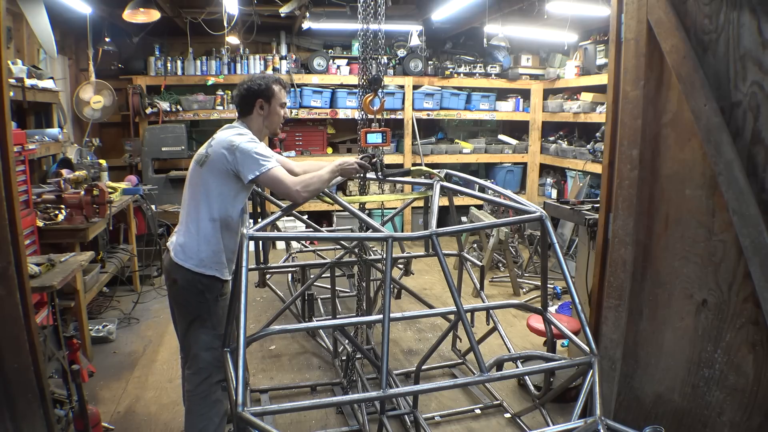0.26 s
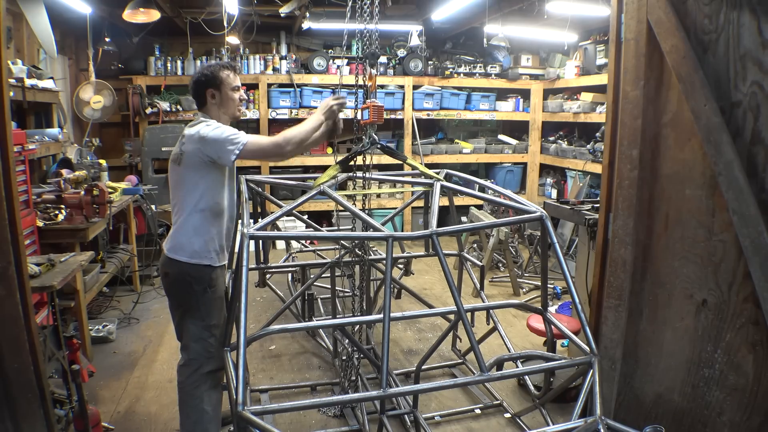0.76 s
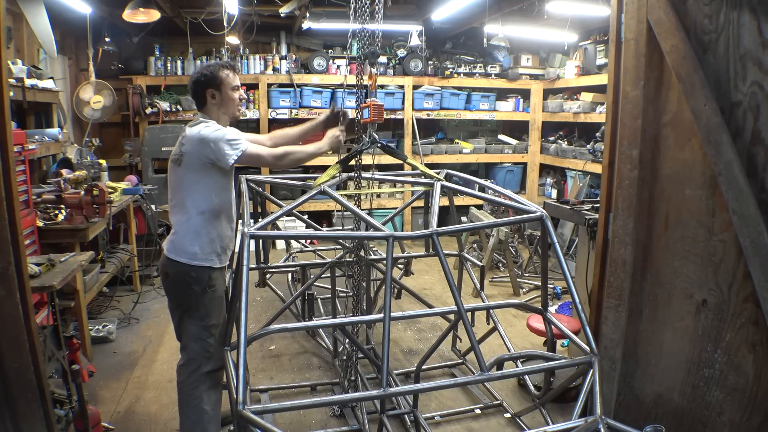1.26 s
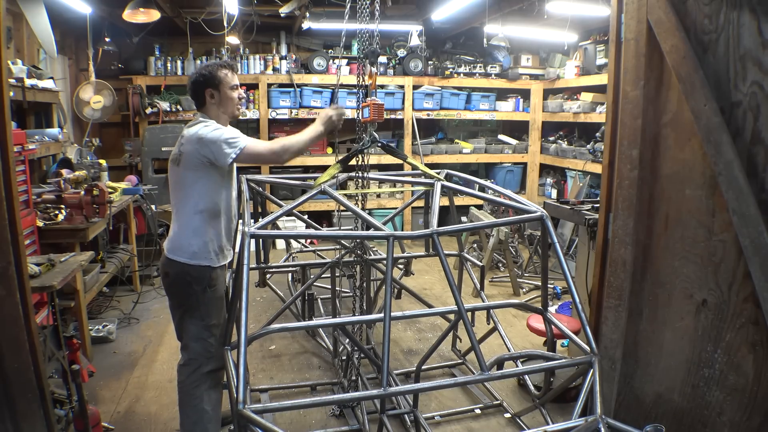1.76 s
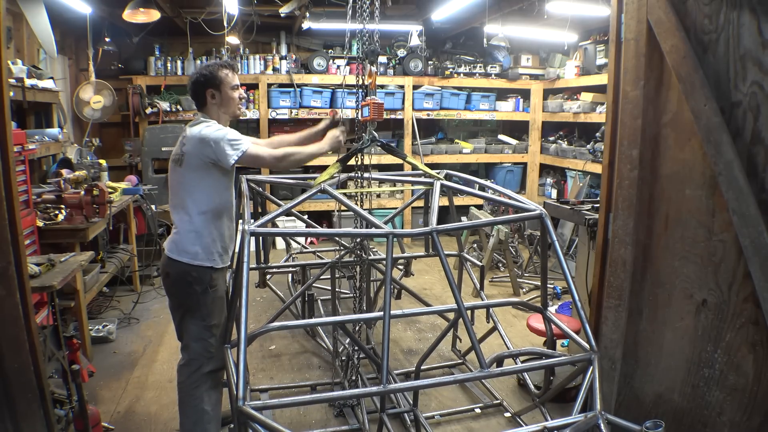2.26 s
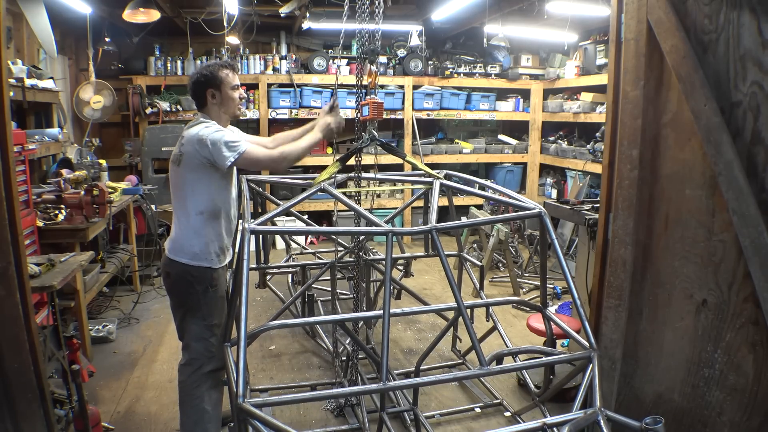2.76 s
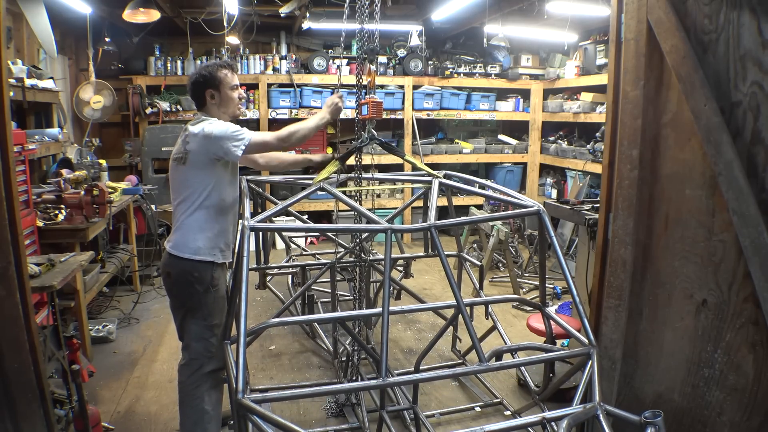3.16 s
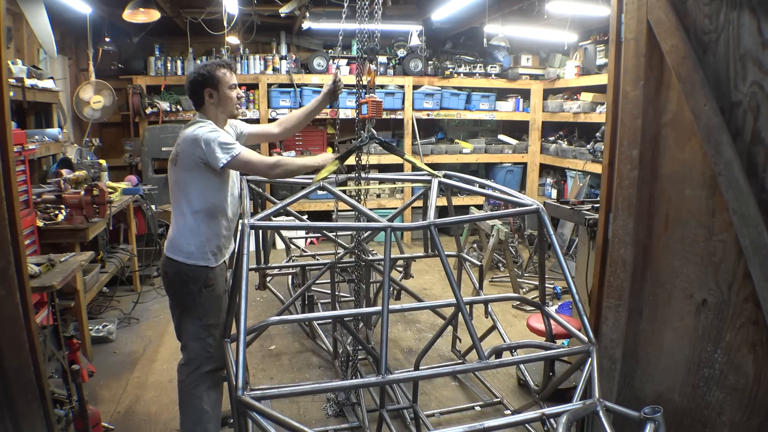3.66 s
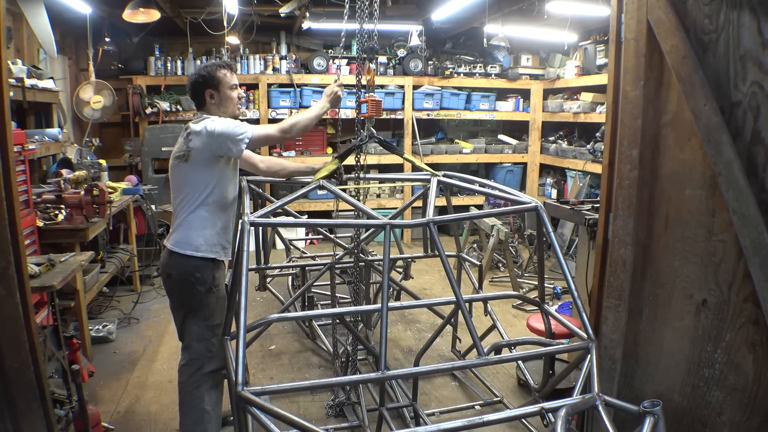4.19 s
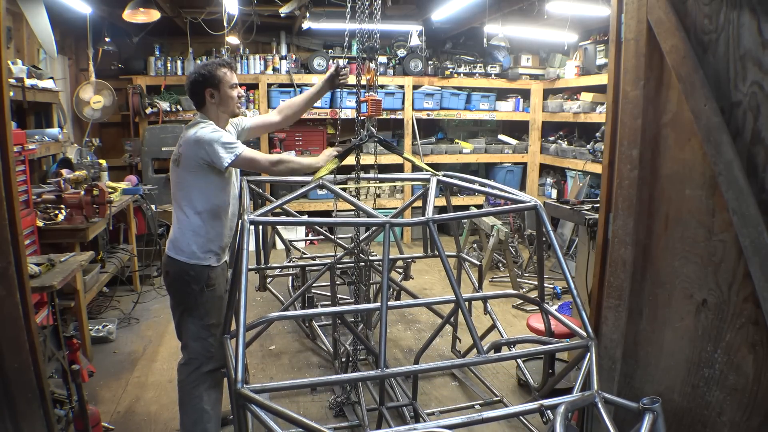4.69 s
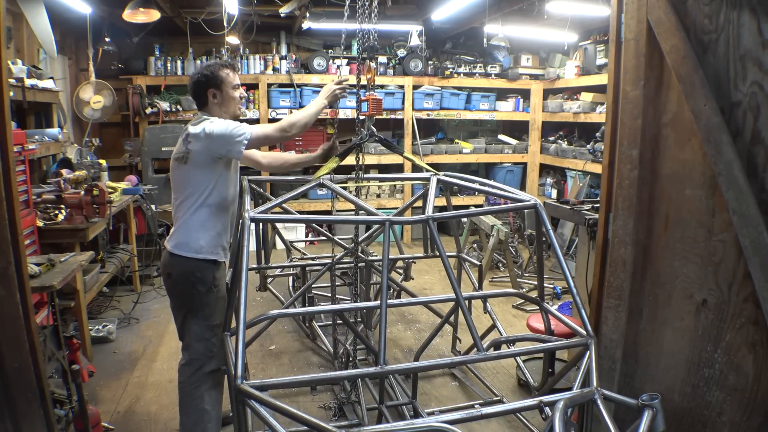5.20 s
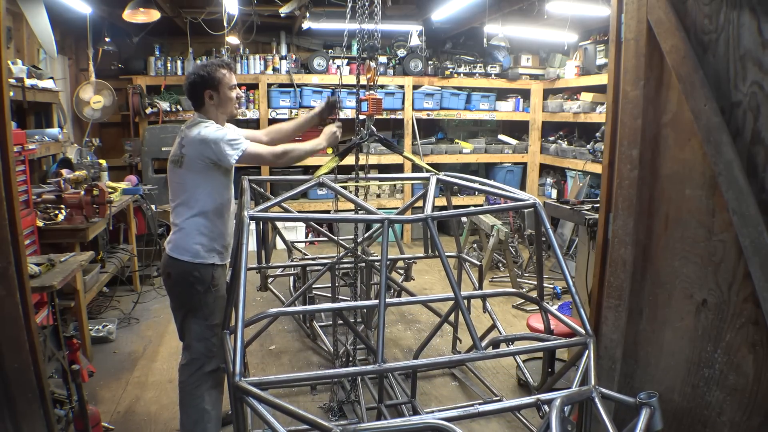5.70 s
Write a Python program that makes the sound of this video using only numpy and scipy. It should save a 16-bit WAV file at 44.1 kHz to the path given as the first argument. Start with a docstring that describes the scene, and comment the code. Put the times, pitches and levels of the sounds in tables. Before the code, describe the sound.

Steel chain rattles and jingles through a hoist in quick surges, with ratchet clicks and knocking gears, in a workshop.

```python
"""A garage: a hand chain hoist lifts a steel frame, pulled hand over hand a few metres away.
The handled chain rings out, then the pulls start. The ratchet pawl ticks faster and slower with each,
the chain rattles over the hand wheel, its links clash, ring and knock into their pockets, and the
gears knock in their housing. The cluttered room adds a short tail."""
import sys
import numpy as np
from scipy import signal
from scipy.fft import rfft, irfft
from scipy.io import wavfile
from scipy.ndimage import uniform_filter1d

SR = 44100
rng = np.random.default_rng(int(sys.argv[2]) if len(sys.argv) > 2 else 0)


def wav_record(signal):
    """Record a signal, one row per channel, as 16-bit PCM in the file named by sys.argv[1]."""
    frames = np.transpose(np.atleast_2d(signal))
    bounded = np.clip(frames, -1, 1)
    # unit amplitude maps onto the largest positive 16-bit level
    quanta = np.round(bounded * 32767).astype(np.int16)
    wavfile.write(sys.argv[1], SR, quanta)


N = 261954
TIME = np.arange(N) / SR
FIRST_PULL_S = .394
CREEP_TEETH_PER_S = 17  # below this the pawl only drops now and then

# Hand-over-hand pulls. Each row: start in s, length in s, rise in s, run-on t60 in s, top speed in
# ratchet teeth per s, then relative levels in dB of chain, housing and link ring.
PULLS = [(0.382, 0.11, 0.0041, 0.85, 41.4, -23, -33, -23), (0.606, 0.59, 0.1, 1.3, 53, -21.5, -31, -23),
         (1.218, 0.31, 0.038, 1.5, 45.6, -21.5, -34, -21.5),
         (1.651, 0.43, 0.18, 1.4, 53, -22.5, -30.5, -20.5),
         (2.169, 0.34, 0.021, 1.4, 55.3, -23, -31.5, -43),
         (2.538, 0.077, 0.016, 0.87, 23, -21.5, -31.5, -23),
         (2.708, 0.36, 0.031, 2.47, 49, -21.5, -30, -22), (3.17, 0.3, 0.045, 1.85, 43.4, -20.5, -30, -28.5),
         (3.656, .52, 0.036, 1.6, 50, -21.5, -29.5, -20.5), (4.18, 0.59, .04, 1.2, 38, -22, -31.5, -22.5),
         (4.838, .48, 0.061, 0.48, 46.5, -21, -30, -21.5), (5.483, 0.033, 0.0053, 2.5, 15, -26, -36, -25),
         (5.637, 0.35, 0.026, 1.04, 41.4, -21.5, -30.5, -23)]
# Steel modes of hand wheel, links and link jingle. Each row: frequency in Hz, relative level in dB.
WHEEL_MODES = [(1480, 2), (1625, 5), (1705, 4), (1840, 1.5), (1910, 6), (1990, 3), (2340, -1.5), (2379, 5),
               (2430, 2), (2475, 1), (2855, 2.5), (2885, 4.5), (2920, 2), (3186, 6), (3230, 0.5),
               (3275, -1), (3618, -4), (3900, 7), (4040, 7), (4115, 2.5), (4156, 6.5), (4285, 1),
               (4856, 6.5), (4910, 4), (4948, 3.5), (4985, -3)]
LINK_MODES = [(5515, 7.7), (5575, 3.9), (5635, 6.5), (5695, 5), (5787, 5), (5940, 3), (6015, 5.5),
              (6055, 6.8), (6125, 3), (6202, 8), (6290, 1), (6390, 1), (6457, 2)]
JINGLE_MODES = [(6790, -1), (7060, 0), (7160, 0), (7505, -10), (7947, 0), (8345, 3), (8473, -2), (8685, 6),
                (9400, -4), (9600, -6), (9700, -7), (9855, -4), (10190, -12), (10400, -4)]
CHAIN_MODES = WHEEL_MODES + LINK_MODES + JINGLE_MODES


def undb(db):
    """Decibels to gain."""
    return 10 ** (np.asarray(db) / 20)


def unit(x):
    """Scale to rms 1."""
    return x / np.sqrt(np.mean(x ** 2))


def convolve(x, response):
    """Apply an impulse response."""
    return signal.fftconvolve(x, response)[:N]


def colour(x, points, size=4096):
    """Minimum-phase filter through (Hz, dB) points, falling 20 dB per octave beyond the ends."""
    hz, db = np.transpose(points)
    octave = np.log2(np.maximum(np.fft.rfftfreq(size, 1 / SR), 1))
    beyond = np.abs(octave - np.clip(octave, np.log2(hz[0]), np.log2(hz[-1])))
    cepstrum = irfft(np.log(undb(np.interp(octave, np.log2(hz), db) - 20 * beyond)))
    cepstrum[1:size // 2] *= 2
    cepstrum[size // 2 + 1:] = 0
    return convolve(x, irfft(np.exp(rfft(cepstrum))))


def fade(t, t60_s):
    """Exponential decay, silent before t = 0."""
    return (t >= 0) * np.exp(-np.log(1000) * np.abs(t) / t60_s)


def burst(t60_s):
    """Dense decaying response of unit energy."""
    response = rng.standard_normal(SR) * fade(TIME[:SR], t60_s)
    return response / np.linalg.norm(response)


def resonate(x, hz, width_hz):
    """One damped mode, as a band-pass."""
    return signal.lfilter(*signal.iirpeak(hz, hz / width_hz, fs=SR), x)


def wander(per_s):
    """Slow random curve with a spread near 1."""
    return np.interp(TIME * per_s, np.arange(1000), rng.standard_normal(1000))


def impacts(per_s, spread_db):
    """Randomly timed contacts of uneven size and either sign, rms 1."""
    hit = rng.random(N) < per_s / SR
    sign = rng.choice([-1, 1], N)
    size = undb(spread_db * np.clip(rng.standard_normal(N), -2, 2))
    return unit(hit * sign * size / np.sqrt(per_s))


def garage_air():
    """Steady noise of the quiet garage."""
    # Each row: frequency in Hz, relative density in dB.
    spectrum = [(25, -19), (60, 4), (130, 0.5), (250, 1.5), (500, -4.5), (1000, -1), (2300, -6.5),
                (5000, -13.5), (15000, -22)]
    return undb(-54.5) * unit(colour(rng.standard_normal(N), spectrum))


def settling():
    """Before the first pull the handled chain rings out."""
    # Chain shimmer. Each row: frequency in Hz, relative density in dB.
    spectrum = [(88, -39), (150, 2), (623, -9), (1000, -2), (2310, -2), (3640, -10), (4160, -11),
                (6430, -8), (7200, -15), (10100, -11), (14000, -34)]
    shimmer = unit(colour(rng.standard_normal(N), spectrum)) * fade(TIME, t60_s=.78)
    ring = sum(undb(db) * resonate(rng.standard_normal(N), hz, width_hz=8)
               for hz, db in WHEEL_MODES + LINK_MODES)
    return undb(-44.5) * shimmer + undb(-44) * unit(ring) * fade(TIME, t60_s=.36)


def wheel_speed():
    """Ratchet teeth per s: each pull spins the wheel up in an early-peaking arc, then it coasts."""
    coast_s, skew, roundness = .1, .8, .45
    speed = np.full(N, .5 * CREEP_TEETH_PER_S)  # the chain still sways between pulls
    for start_s, length_s, _, _, top_speed, *_ in PULLS:
        progress = np.clip((TIME - start_s) / (length_s + coast_s), 0, 1)
        arc = np.abs(np.sin(np.pi * progress ** skew)) ** roundness
        speed = np.maximum(speed, top_speed * arc)
    return speed


def shaking_db(levels_db, rise_scale, trend_db, run_on_scale):
    """How hard a part shakes: each pull rises, holds with a trend and runs out; the strongest leads."""
    shake = np.zeros(N)
    for (start_s, length_s, rise_s, t60_s, *_), db in zip(PULLS, levels_db):
        t = TIME - start_s
        attack = np.sqrt(np.clip(t / (rise_s * rise_scale), 0, 1))
        hold = undb(db + trend_db * (np.clip(t / length_s, 0, 1) - 1))
        run_on = fade(np.maximum(t - length_s, 0), t60_s * run_on_scale)
        shake = np.maximum(shake, attack * hold * run_on)
    uneven_feed_db = wander(per_s=18)
    return 20 * np.log10(shake + 1e-9) + uneven_feed_db


def add_swells(base_db, rows):
    """Level in dB after rounded swells add their power to a base level."""
    power = sum(undb(db) ** 2 * np.sin(np.pi * np.clip((TIME - start_s) / length_s, 0, 1))
                for start_s, length_s, db in rows)
    return 10 * np.log10(undb(base_db) ** 2 + power)


def wavering_mode(x, hz, width_hz, drift=.003):
    """A mode whose pitch shifts a little as one link follows another."""
    pitch_hz = hz * (1 + drift * wander(per_s=7))
    turn = np.exp(2j * np.pi * np.cumsum(pitch_hz) / SR)
    pole = np.exp(-np.pi * width_hz / SR)
    return (turn * signal.lfilter([1], [1, -pole], x * turn.conj())).real


def rattle(contacts, level_db, spectrum, modes, ring_db, width_hz, wander_db, clack_t60_s, spots=8):
    """Contacts clack on a steel part and ring it; which modes answer shifts with the point of contact."""
    force = contacts * undb(level_db) * (TIME >= FIRST_PULL_S)
    spot = rng.integers(spots, size=N)  # each spot clacks differently
    clack = sum(convolve(force * (spot == k), burst(clack_t60_s)) for k in range(spots))
    ring = 0
    for hz, db in modes:
        drive = force * undb(wander_db * wander(per_s=14))
        ring += undb(db) * unit(wavering_mode(drive, hz, width_hz))
    return unit(unit(colour(clack, spectrum)) + undb(ring_db) * unit(ring)) * np.std(force)


def gearbox(teeth_per_s, free_db=-50.5, strain_share=.11):
    """The gears knock and rumble, louder under strain, and shake their housing."""
    # Gears straining under the load, and the swinging load shaking the housing.
    # Each row: start in s, length in s, relative level in dB.
    strains = [(.38, 0.11, -39.5), (.48, .48, -45.5), (1.1, 0.15, -46), (1.44, 0.11, -44), (1.96, .32, -41),
               (2.26, .3, -36), (2.89, .23, -39), (3.36, 0.46, -40.5), (3.8, 1.28, -46), (4.96, 0.16, -39),
               (5.13, 0.18, -37.5), (5.27, 0.32, -42.5), (5.7, 0.34, -37.5)]
    shudders = [(.38, .13, -30), (.6, 0.2, -26.5), (1.78, .19, -28.5), (2.25, .19, -24.5),
                (2.73, 0.29, -26.5), (3.12, 0.089, -27.5), (3.74, 0.17, -28), (4.35, 0.095, -28.5),
                (4.84, 0.29, -26.5), (5.83, 0.14, -26)]
    # Contact spectra and housing modes. Each row: frequency in Hz, relative level in dB.
    gear_spectrum = [(40, -32), (68, -12), (95, 1.5), (170, 0), (240, -5), (330, -0.5), (430, -1),
                     (540, 1.5), (750, -10)]
    housing_spectrum = [(200, -25), (330, -12.5), (430, -11.5), (520, -3.5), (720, -6.5), (860, -0.5),
                        (1150, -3), (1400, -6.5), (1900, -9.5)]
    housing_modes = [(843, 14), (911, 13.5), (975, 11.5), (1030, 8), (1125, 11.5), (1260, 6)]
    *_, pull_db, _ = np.transpose(PULLS)
    gear_db = add_swells(free_db, strains)
    shake_db = shaking_db(pull_db, rise_scale=.073, trend_db=-1.2, run_on_scale=6.1)
    housing_db = add_swells(shake_db + strain_share * (gear_db - free_db), shudders)
    knocks = impacts(24 * teeth_per_s, spread_db=1)
    gears = unit(colour(knocks, gear_spectrum)) * undb(gear_db + 2) * (TIME >= FIRST_PULL_S)
    housing = rattle(knocks, housing_db - .3, housing_spectrum, housing_modes,
                     ring_db=-1.5, width_hz=26, wander_db=3, clack_t60_s=.037)
    return gears + housing


def running_chain(teeth_per_s):
    """Hand wheel rattle and link ring, driven by the same contacts, which crowd as speed rises."""
    # Contact spectra. Each row: frequency in Hz, relative density in dB.
    wheel_spectrum = [(1000, -22.5), (1480, -0.5), (1720, 2), (2020, 2), (2200, 2.5), (2500, 1),
                      (3200, -0.5), (3600, -0.5), (4150, 5), (4600, -3.5), (5200, 1), (6200, -19.5)]
    link_spectrum = [(4800, -39), (5400, -10), (5600, 15), (6100, 15), (6500, 5), (7500, -50)]
    jingle_spectrum = [(5500, -6), (6700, 0), (8700, -3), (9200, -3.5), (10700, -6), (12200, -13),
                       (15800, -22)]
    *_, pull_chain_db, _, pull_link_db = np.transpose(PULLS)
    wheel_db = shaking_db(pull_chain_db, rise_scale=.82, trend_db=-.24, run_on_scale=2.1)
    link_db = shaking_db(pull_link_db, rise_scale=1.9, trend_db=2.2, run_on_scale=2.6)
    jingle_db = shaking_db(pull_chain_db, rise_scale=.86, trend_db=-1.2, run_on_scale=1)
    contacts = impacts(20 * teeth_per_s, spread_db=2)
    wheel = rattle(contacts, wheel_db - 2, wheel_spectrum, WHEEL_MODES,
                   ring_db=-2, width_hz=30, wander_db=3.2, clack_t60_s=.035)
    ring = rattle(contacts, link_db - 5, link_spectrum, LINK_MODES,
                  ring_db=-.5, width_hz=19, wander_db=.5, clack_t60_s=.068)
    jingle = rattle(contacts, jingle_db - 1.23, jingle_spectrum, JINGLE_MODES,
                    ring_db=-9, width_hz=28, wander_db=1.5, clack_t60_s=.07)
    return wheel, ring + jingle


def clashes():
    """Snatching the slack chain sets off a brief flurry of link collisions, part crack, part ring."""
    # Each row: start in s, level in dB, centre in Hz, width in Hz, hold in s, t60 in s,
    # ringing share of the power from 0 to 1.
    snatches = [(0.3935, -17.5, 3380, 9000, 0.008, 0.11, 0), (2.165, -19, 7100, 1500, 0.04, 0.33, 0.95),
                (2.161, -20.5, 3430, 3500, 0.04, 0.8, 0.7), (2.301, -31.5, 1270, 1710, 0.16, 0.2, 0),
                (2.539, -18.5, 10150, 1400, 0.07, 0.26, 0.85), (2.537, -25.5, 3800, 700, 0.052, 0.3, 0.6),
                (2.734, -22, 5770, 600, 0.013, 0.2, 0.9), (3.19, -24, 9660, 1394, 0.024, 0.3, 0.6),
                (3.252, -31, 9810, 1205, 0.052, 0.67, 0.79), (3.283, -22.5, 4180, 6000, 0.023, .1, 0),
                (3.657, -19, 5950, 7030, 0, 0.13, 0.22), (4.722, -22.5, 9890, 1231, 0.024, 0.33, .7),
                (5.491, -25, 2950, 6800, 0.025, 0.33, 0.7), (5.654, -17.5, 2870, 2410, 0.0012, 0.27, 0.81),
                (5.657, -22, 5860, 1990, 0.056, 0.29, 1)]
    crack = colour(impacts(5000, spread_db=4), [(500, 3.5), (10500, -8.5), (13000, -1)])
    ring = sum(undb(db) * resonate(impacts(900, spread_db=3.5), hz, width_hz=21)
               for hz, db in CHAIN_MODES)
    out = 0
    for start_s, db, hz, width_hz, hold_s, t60_s, share in snatches:
        dull, clear = (unit(resonate(resonate(x, hz, width_hz), hz, width_hz)) for x in (crack, ring))
        envelope = (TIME >= start_s) * fade(np.maximum(TIME - start_s - hold_s, 0), t60_s)
        out += undb(db) * envelope * (np.sqrt(1 - share) * dull + np.sqrt(share) * clear)
    return out


def pawl(teeth_per_s, scatter_db=2.5, landings=10):
    """The pawl drops once per passing tooth and lands in one of several ways."""
    # Single drops while the wheel creeps. Each row: time in s, relative level in dB.
    creep_drops = [(.566, -33), (0.621, -22.5), (2.664, -21), (2.706, -20), (3.165, -20), (3.607, -30),
                   (4.846, -21), (4.885, -23), (5.382, -32), (5.484, -25), (5.552, -24), (5.597, -21.5),
                   (5.634, -20.5)]
    # Pawl tick. Each row: frequency in Hz, relative density in dB.
    spectrum = [(150, -18), (400, -10.5), (900, -2.5), (1800, -2.5), (3200, -2.5), (4800, -3), (6000, -3.5),
                (8000, 0.5), (10500, 0), (12500, -8), (15800, -8.5)]
    creep_s, creep_db = np.transpose(creep_drops)
    teeth = np.floor(np.cumsum(teeth_per_s * (teeth_per_s > CREEP_TEETH_PER_S)) / SR)
    running_s = TIME[np.flatnonzero(np.diff(teeth))]
    running_db = -24.5 + scatter_db * rng.standard_normal(len(running_s))
    onsets = (np.r_[creep_s, running_s] * SR).astype(int)
    size = undb(np.r_[creep_db, running_db])
    landing = rng.integers(landings, size=len(onsets))
    ticks = 0
    for k in range(landings):
        blows = np.bincount(onsets, size * (landing == k), N)[:N]
        ticks += convolve(blows, burst(t60_s=.053) + undb(-3.5) * burst(t60_s=.19))
    return undb(-26.5) * unit(colour(ticks, spectrum))


def chatters(reach_hz=65, detune=.002, rise_s=.0064, evening=.45, evening_s=.046):
    """A run of links chatters on one spot, keeps neighbouring modes beating and lets them ring out."""
    # Each row: start in s, length in s, centre in Hz, level in dB.
    runs = [(0.779, 0.17, 2400, -32), (0.799, .22, 2862, -31.5), (.82, 0.34, 3210, -30.5),
            (.83, 0.13, 4850, -29), (0.831, 0.26, 5630, -25.5), (.88, .12, 5790, -30),
            (1.0, 0.23, 4960, -28), (1.027, .07, 6140, -23), (1.057, .11, 5790, -24),
            (1.231, .24, 5590, -25.5), (1.26, .15, 5850, -23), (1.29, .09, 6230, -24),
            (1.301, 0.094, 4100, -27.5), (1.34, 0.14, 2350, -28.5), (1.35, .16, 2880, -30.5),
            (1.426, 0.074, 3202, -32.5), (1.51, 0.15, 5780, -25), (1.536, 0.066, 6270, -23.5),
            (1.888, 0.23, 5590, -25.5), (2.02, 0.053, 6150, -25), (2.75, 0.35, 5780, -27),
            (2.858, 0.3, 5600, -25), (2.879, 0.23, 6050, -29), (2.97, 0.09, 6340, -29),
            (3.128, 0.14, 2875, -33), (3.192, .28, 6180, -26), (3.269, 0.2, 2430, -29),
            (3.301, .23, 4946, -32), (3.361, .18, 2860, -28), (3.378, .2, 5630, -28.5),
            (3.43, 0.17, 1637, -30), (3.656, .12, 4935, -28), (3.66, 0.68, 2840, -31.5),
            (3.72, 0.37, 3206, -33), (3.806, .11, 2428, -27.5), (3.824, 0.068, 4115, -28),
            (3.89, 0.221, 5633, -27), (3.951, .4, 6063, -27), (3.978, 0.77, 4970, -32.5),
            (3.998, .1, 6460, -35), (4.1, 0.66, 5700, -32), (4.25, 0.7, 4090, -32), (4.3, .09, 4945, -29),
            (4.359, .26, 6470, -29), (4.629, .07, 4950, -28), (4.4, 0.58, 2882, -31),
            (4.45, 0.49, 2424, -32), (4.5, .2, 6030, -29.5), (4.85, 0.26, 6030, -29),
            (5.029, 0.076, 3206, -31), (5.151, 0.21, 2421, -31), (5.219, .14, 5620, -26),
            (5.229, .11, 5980, -24.5), (5.263, .3, 1690, -32.5), (5.66, 0.059, 3190, -30.5),
            (5.66, 0.24, 2870, -30)]
    t = TIME[:SR]
    out = np.zeros(N + SR)
    for start_s, length_s, centre_hz, db in runs:
        contacts = impacts(400, spread_db=2.5)[:SR]
        shifts = 1 + detune * rng.standard_normal(len(CHAIN_MODES))  # pitch varies from link to link
        ring = np.zeros(SR)
        for (hz, mode_db), shift in zip(CHAIN_MODES, shifts):
            nearness = np.exp(-.5 * ((hz - centre_hz) / reach_hz) ** 2)
            if nearness > 1e-4:
                ring += nearness * undb(mode_db) * resonate(contacts, hz * shift, width_hz=25)
        # rubbing links damp what they excite, which evens the ring
        power = uniform_filter1d(ring ** 2, int(evening_s * SR))
        ring /= (power + np.mean(power) / 20) ** (evening / 2)
        envelope = np.minimum(t / rise_s, 1) * fade(np.maximum(t - length_s, 0), t60_s=.11)
        onset = int(start_s * SR)
        out[onset:onset + SR] += undb(db) * envelope * ring / (np.std(ring[t < length_s]) + 1e-9)
    return out[:N]


def seatings():
    """A link slips into its pocket with a dull knock: a spray of contacts the load damps at once."""
    # Each row: start in s, relative level in dB, ring in Hz.
    knocks = [(1.992, -11.5, 1460), (2.137, -8.5, 1640), (2.207, -29, 1098), (2.362, -10, 950),
              (2.417, -18, 1408), (2.471, -16, 1199), (3.622, -17, 1360), (5.177, -8.5, 1306),
              (5.185, -7, 1830), (5.77, -12.5, 1160)]
    spray = impacts(6700, spread_db=7.5)
    return sum(undb(db + 11) * resonate(spray * fade(TIME - start_s, t60_s=.052), hz, width_hz=260)
               for start_s, db, hz in knocks)


def scene():
    """Hoist and garage in stereo; each group of sources reaches the two channels by its own paths."""
    # Stereo width. Each row: frequency in Hz, gain of the side signal in dB.
    side_spectrum = [(60, -14), (125, -15), (250, -39.5), (600, -28.5), (1250, -14.5), (2400, -19.5),
                     (4000, -29), (5700, -11), (8300, -10.5), (11000, -8.5), (15000, -36)]
    lean_db = -.75  # left minus right
    teeth_per_s = wheel_speed()
    wheel, links = running_chain(teeth_per_s)
    groups = [pawl(teeth_per_s), gearbox(teeth_per_s) + wheel, links,
              chatters() + seatings() + garage_air(), clashes() + settling()]
    direct = sum(groups)
    room = np.r_[np.zeros(SR // 200), burst(t60_s=.35)]  # tail starts 5 ms late
    mid = direct + undb(-8.5) * convolve(direct, room)
    side = colour(sum(convolve(group, burst(t60_s=.3)) for group in groups), side_spectrum)
    return np.array([(mid + side) * undb(lean_db / 2), (mid - side) * undb(-lean_db / 2)])


def record(dry):
    """Gain control holds down the loudest stretches; peaks are rounded and the top is cut."""
    follow_s, threshold_db, ceiling, top_hz = .012, -13, .95, 15900
    pole = np.exp(-1 / (follow_s * SR))
    power = signal.lfilter([1 - pole], [1, -pole], np.mean(dry ** 2, axis=0))
    held = dry / (1 + (power / undb(threshold_db) ** 2) ** 2) ** (1 / 4)
    rounded = ceiling * np.tanh(held / ceiling)
    return signal.sosfilt(signal.ellip(10, .2, 80, top_hz, fs=SR, output="sos"), rounded)


dry = scene()
out = record(dry)
wav_record(out)
```